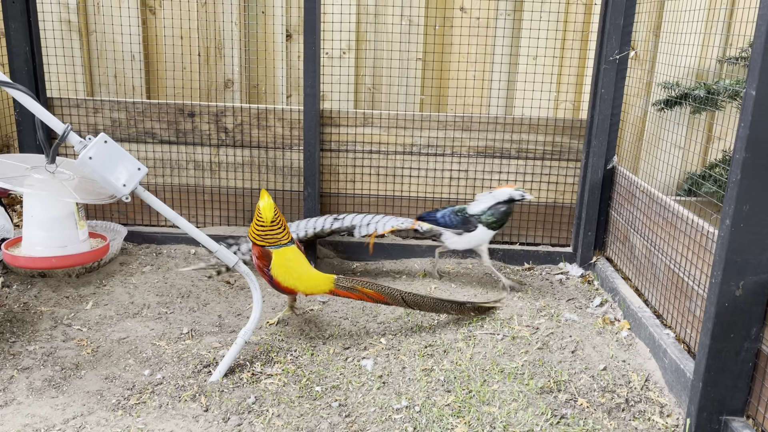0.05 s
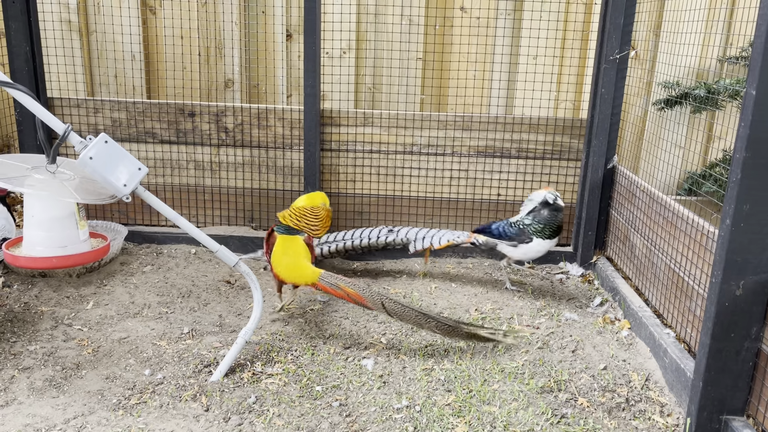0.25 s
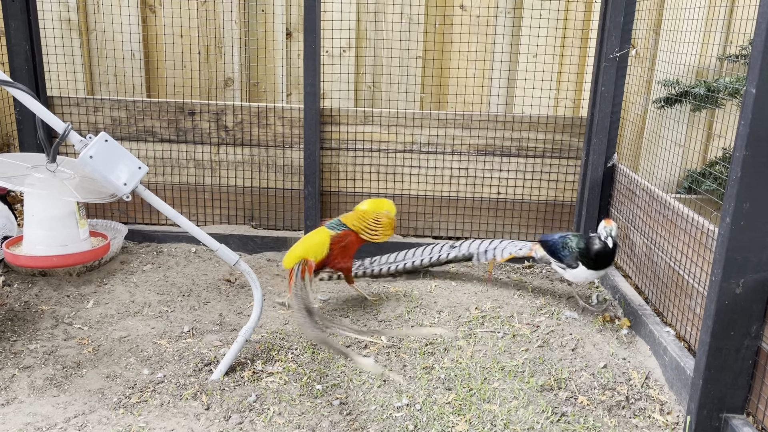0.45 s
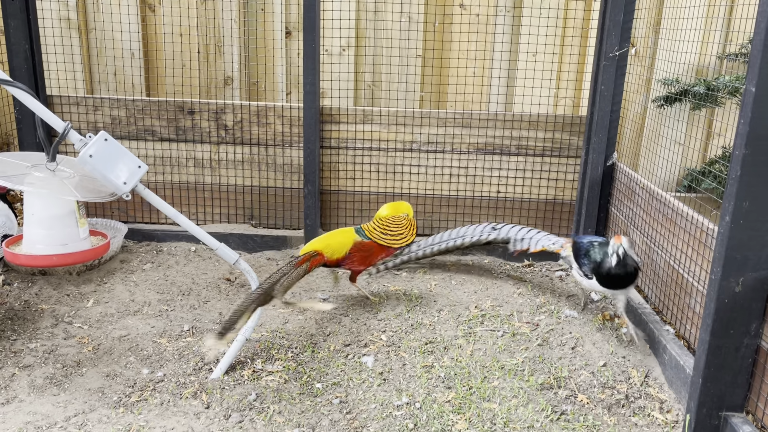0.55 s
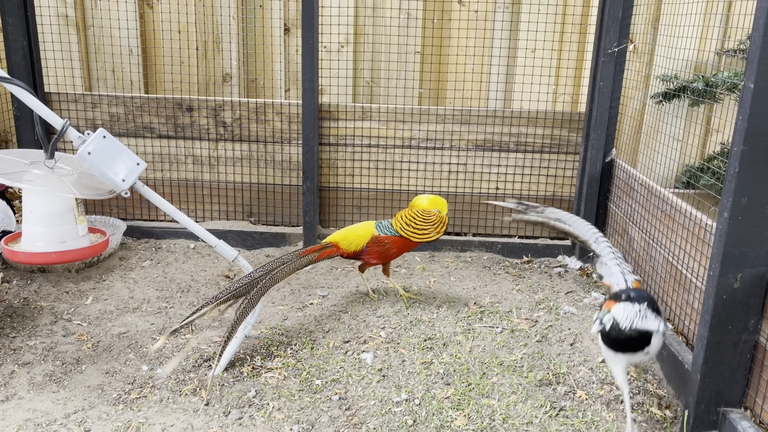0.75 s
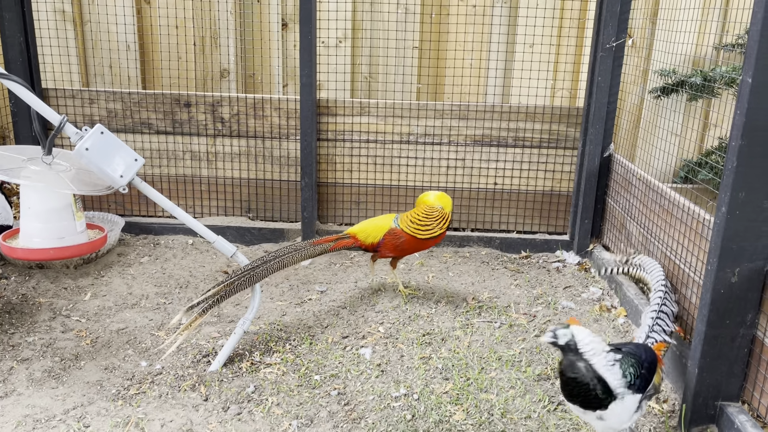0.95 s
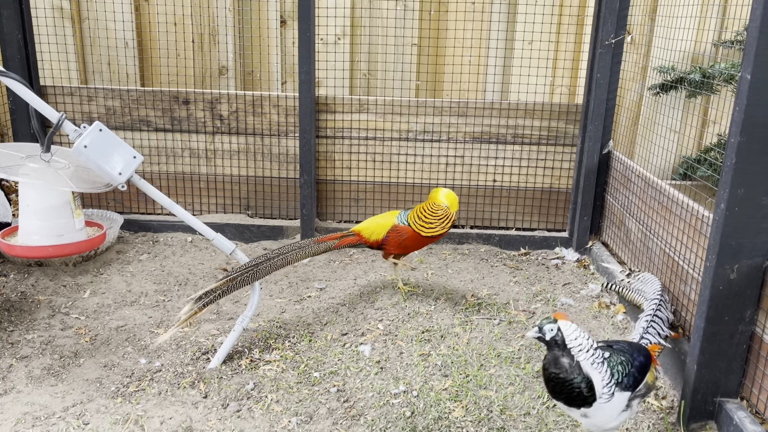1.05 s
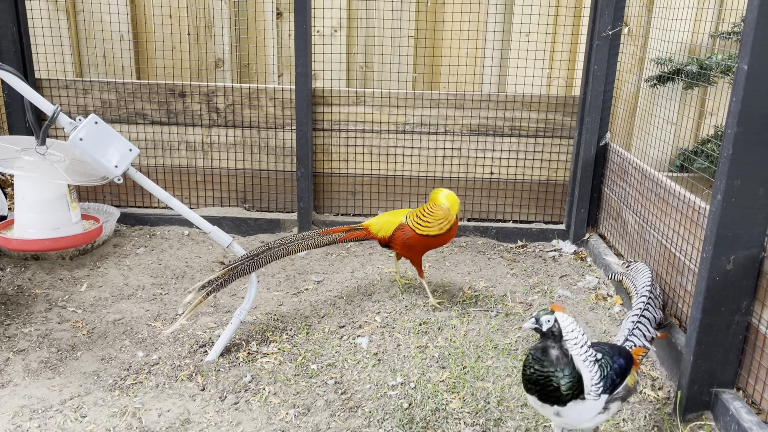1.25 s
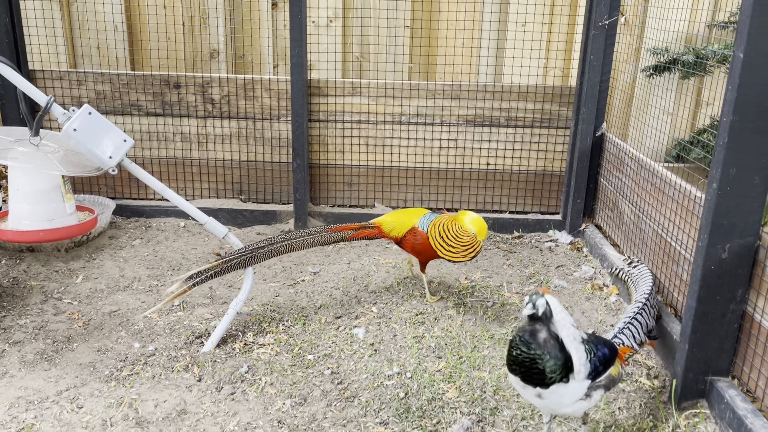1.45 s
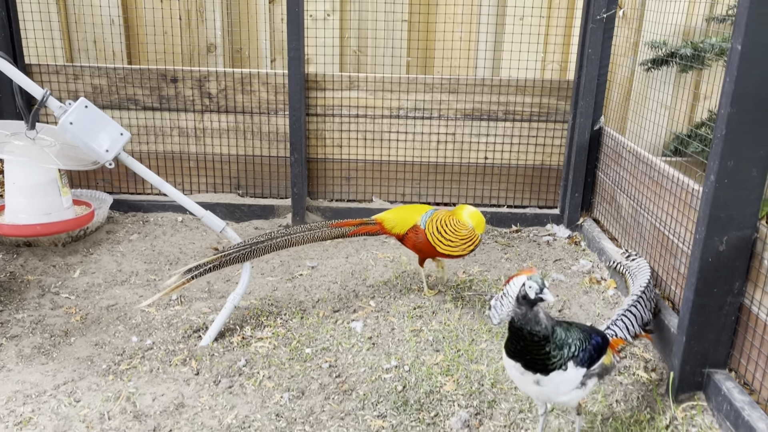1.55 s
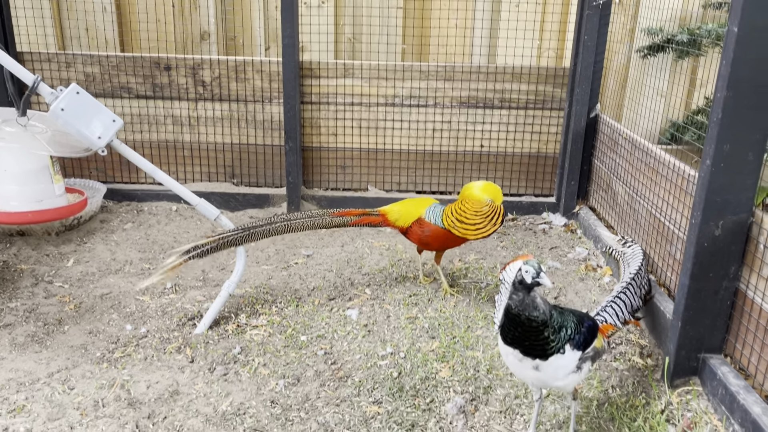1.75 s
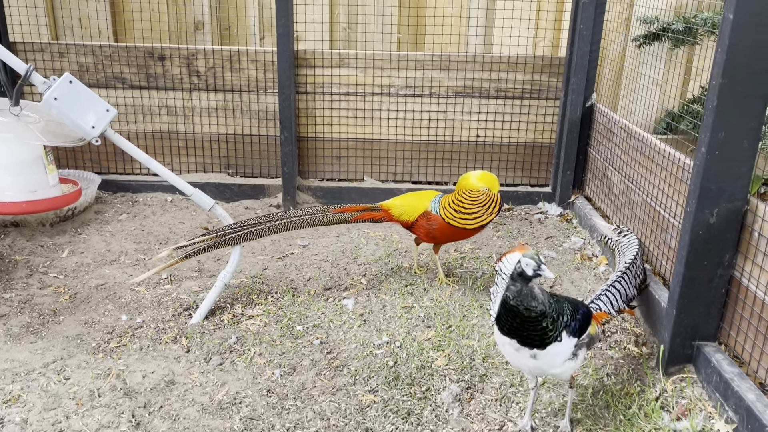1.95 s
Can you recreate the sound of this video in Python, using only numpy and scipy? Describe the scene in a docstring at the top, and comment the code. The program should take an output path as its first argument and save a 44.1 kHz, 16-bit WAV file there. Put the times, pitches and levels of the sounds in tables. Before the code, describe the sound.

Shrill pheasant squeal outdoors, followed by quiet clucks, peeps and light foot scuffs.

```python
"""Two pheasants walk about in a wire aviary backed by a wooden fence.
A distant rumble, open air and a low hum run throughout. After a faint scuff, one bird gives a shrill,
wavering squeal that breaks downward at 0.4 s. From 0.6 s feet scuff and pat the dry ground,
and soft arched peeps and clucks follow until 1.8 s. Fence and ground throw back quick echoes."""
import sys
import numpy as np
from scipy import signal
from scipy.fft import rfft, irfft
from scipy.io import wavfile

SR = 44100
rng = np.random.default_rng(int(sys.argv[2]) if len(sys.argv) > 2 else 0)


def wav_out(sig):
    """Save sig, one row per channel (or a flat mono array), as 16-bit PCM at SR to the path in sys.argv[1]."""
    wavfile.write(sys.argv[1], SR, np.round(np.clip(np.atleast_2d(sig).T, -1, 1) * 32767).astype(np.int16))


N = 88200
T = np.arange(N) / SR
FREQS = np.maximum(np.arange(N // 2 + 1) * SR / N, 1)
JITTER_HZ = 684   # bandwidth of the voice's pitch jitter


def from_db(db):
    """Decibels to gain."""
    return 10 ** (np.asarray(db) / 20)


def rms_one(x):
    """Scale to unit power."""
    return x / np.sqrt(np.mean(x ** 2) + 1e-20)


def in_time(rows):
    """Each column of a curve at every sample."""
    time_s, *columns = np.transpose(rows)
    return [np.interp(T, time_s, column) for column in columns]


def at_hz(points, hz):
    """Read a spectrum on a log-frequency axis."""
    freq_hz, values = np.transpose(points)
    return np.interp(np.log(hz), np.log(freq_hz), values)


def panned(x, pan_db):
    """Left louder than right by pan_db."""
    return np.array([x * from_db(pan_db / 2), x * from_db(-pan_db / 2)])


def drift(rate_hz):
    """Low-passed noise, unit power."""
    return rms_one(irfft(rfft(rng.standard_normal(N)) / (1 + (FREQS / rate_hz) ** 2), N))


def coloured(x, spectrum):
    """Give a noise a spectrum; unit power."""
    return rms_one(irfft(rfft(x) * from_db(at_hz(spectrum, FREQS)), N))


def partial(hz, multiple):
    """One partial of a gliding pitch, unit power, muted above Nyquist."""
    return np.sqrt(2) * np.sin(2 * np.pi * multiple * np.cumsum(hz) / SR) * (multiple * hz < SR / 2)


def bursts(rows):
    """Sum of envelopes: linear attack, exponential decay."""
    return sum(from_db(level_db) * np.clip((T - start_s) / attack_s, 0, 1)
               * np.exp(-np.maximum(T - start_s - attack_s, 0) / decay_s)
               for start_s, attack_s, decay_s, level_db in rows)


def wide_noise(spectrum):
    """Stereo noise, alike in the bass and looser above."""
    # left-right likeness: freq_hz, correlation
    likeness = [(40, 1), (120, 0.4), (250, 0.59), (500, 0.058), (800, -0.089), (1400, -0.13), (3000, 0.6),
                (9000, 0.066)]
    alike = at_hz(likeness, FREQS)
    mid, side = rfft(rng.standard_normal((2, N)))
    stereo = np.sqrt(1 + alike) * mid + np.sqrt(1 - alike) * side * [[1], [-1]]
    return coloured(irfft(stereo, N), spectrum)


def outdoors():
    """Slowly swelling distant rumble and steady open air."""
    # rumble spectrum: freq_hz, gain_db
    rumble_colour = [(12, -36.5), (25, -21.5), (38, -7), (50, 1), (62, -2), (76, 6), (100, -7), (150, -9),
                     (200, -13.5), (300, -22.5), (600, -43), (3000, -100)]
    # rumble swell: time_s, gain_db
    rumble_swell = [(0, 2), (.15, 1.5), (.35, -1), (.55, -3), (.66, 1.5), (.85, -3), (.93, 2), (1.1, -0.5),
                    (1.32, 0), (1.45, 0.5), (1.6, -0.5), (2, -0.5)]
    # air spectrum: freq_hz, gain_db
    air_colour = [(100, 0), (250, -1.5), (460, 1.5), (650, -1), (950, -2), (1300, -7.5), (1760, -8.5),
                  (2600, -19), (4500, -21), (6500, -23), (8600, -18.5), (10000, -21.5), (11200, -26.5),
                  (12200, -62), (15000, -70)]
    rumble = from_db(-41.4 + in_time(rumble_swell)[0]) * wide_noise(rumble_colour)
    return rumble + from_db(-50.4) * wide_noise(air_colour)


def hum():
    """Machine hum, wavering in pitch and level."""
    # overtones: multiple, gain_db
    overtones = [(2, -20), (3, -26.5), (3.8, -23)]
    hz = 120.64 * (1 + .012 * drift(5.7))
    tone = partial(hz, 0.99) + sum(from_db(db) * partial(hz, k) for k, db in overtones)
    return tone * from_db(-43.9 + 0.9 * drift(5.8))


def aviary(x, scatter_db):
    """Direct sound, a few echoes, quick scatter in the pen and a faint tail from the yard."""
    # echoes off ground, frame, fence and a far wall: delay_s, left_db, right_db
    echoes = [(.0037, -15, -34.5), (.0093, -7.5, -18), (0.0145, -40, -12.5), (0.0204, -25, -25),
              (.104, -32.5, -39.5)]
    # phase lead of the left channel: freq_hz, lead_rad
    left_lead = [(300, .05), (1500, .4), (2400, .8), (4400, 1.25), (8000, 1.2), (12000, 1.15)]
    pen_t60_s, pen_db = 0.054, -17.5
    yard_t60_s, yard_db, yard_delay_s = 0.44, -22, 0.03
    pen = rng.standard_normal((2, N)) * from_db(-60 * T / pen_t60_s) * (T > echoes[0][0])
    yard = rng.standard_normal((2, N)) * from_db(-60 * T / yard_t60_s) * (T > yard_delay_s)
    scatter = from_db(pen_db) * rms_one(pen) + from_db(yard_db) * rms_one(yard)
    response = from_db(scatter_db) * scatter / np.sqrt(N)
    for delay_s, left_db, right_db in echoes:
        response[:, int(delay_s * SR)] += from_db([left_db, right_db])
    wet = x + signal.fftconvolve(x, response, axes=1)[:, :N]
    return irfft(rfft(wet) * np.exp(.5j * at_hz(left_lead, FREQS) * np.array([[1], [-1]])), N)


def feet():
    """Feet and tail scuff dry grit; footfalls pat the earth."""
    # scuffs: start_s, attack_s, decay_s, level_db
    scuffs = [(.05, 0.038, 0.11, -59), (.622, .005, 0.03, -53.5), (.786, .008, 0.022, -54),
              (.858, 0.0074, 0.027, -58), (.915, 0.0049, 0.07, -56), (1.49, 0.015, .04, -83),
              (1.69, 0.015, 0.042, -63.5), (1.91, 0.022, 0.043, -68)]
    # scuff spectrum: freq_hz, gain_db
    grit_colour = [(1000, 3), (2500, -0.5), (3400, 0.5), (5500, -2), (8500, 4), (10500, 5), (11800, -3.5),
                   (13000, -38), (15000, -40)]
    # footfalls: start_s, attack_s, decay_s, level_db
    steps = [(.613, 0.00093, 0.0065, -42), (.72, .003, .008, -57), (.945, 0.014, 0.017, -53)]
    # footfall spectrum: freq_hz, gain_db
    earth_colour = [(150, -69), (400, 5.5), (750, 16.5), (1300, 9.5), (2500, -24), (6000, -38)]
    grains = rng.standard_normal(N) * from_db(drift(rate_hz=420))
    earth = coloured(rng.standard_normal(N), earth_colour)
    return bursts(scuffs) * coloured(grains, grit_colour) + bursts(steps) * earth


def peeps():
    """Contact notes: a raspy start, then the pitch arches in steps through the voice's registers."""
    # peeps and clucks; touching notes join into one call: start_s, rise_s, fall_s, start_hz, top_hz,
    # end_hz, level_db, swell_db, overtone_db, rasp_db, pan_db
    notes = [(.697, 0.024, 0.003, 1004, 2444, 2400, -39.5, -2, -21.5, -43, 2),
             (0.752, 0.014, 0.0093, 1050, 2263, 2105, -41, -7, -21, -48, 1.5),
             (0.929, .026, 0.0043, 1024, 1370, 1350, -56, -8, -23, -57, -8),
             (0.966, 0.012, 0.0148, 1003, 1645, 1250, -41.5, -3, -20, -54, 1.5),
             (1.004, 0.014, 0.0081, 1076, 1650, 1390, -40, 2, -19.5, -79, 1.5),
             (1.148, 0.0153, 0.0062, 895, 2503, 2380, -38, 4.5, -21, -38.5, 1),
             (1.162, 0.011, 0.013, 3210, 3510, 3330, -39, -7, -14, -86, 3),
             (1.199, 0.00676, 0.0061, 2573, 3486, 2380, -27.5, 9, -27, -51, 4.5),
             (1.476, .028, 0.0015, 1094, 1900, 1950, -38, 14, -23.5, -37.5, -.4),
             (1.503, 0.015, 0.022, 2100, 2530, 2370, -42, 2, -19, -63, 6),
             (1.547, 0.0022, 0.023, 1950, 1950, 1540, -40, -3, -16, -64, -2),
             (1.707, 0.017, 0.0036, 1408, 1958, 1950, -42, 12, -14, -46.5, -0.5),
             (1.724, 0.0174, 0.0076, 2216, 2436, 2520, -38.5, 18, -29, -61, 2),
             (1.744, 0.0085, 0.0081, 2650, 2810, 2680, -38, 7, -24, -71, 5.5)]
    # throat response: freq_hz, gain_db
    throat = [(800, 2), (1200, -4.5), (1700, -1.5), (2000, 3), (2400, -8.5), (2800, 0.5), (3400, -8),
              (5000, -8), (6800, -5.5), (9000, -28)]
    # rasp spectrum: freq_hz, gain_db
    rasp_colour = [(300, -31), (650, -5), (1000, 0), (1600, 4.5), (2400, -11.5), (4000, -32.5),
                   (8000, -50.5)]
    register_hz, register_pull, slip_db = 825.3, 0.35, -4
    clear_spread_hz, hoarse_spread_hz, hoarse_s = 9.1, 109.6, 0.0051
    edge_s, rasp_attack_s, rasp_decay_s = 0.0026, 0.0053, 0.0076
    rasp_noise = coloured(rng.standard_normal(N), rasp_colour)
    out = 0
    for (start_s, rise_s, fall_s, start_hz, top_hz, end_hz,
         level_db, swell_db, overtone_db, rasp_db, pan_db) in notes:
        length_s = rise_s + fall_s
        t = np.clip(T - start_s, 0, length_s)
        arch_hz = top_hz + np.where(t < rise_s, (start_hz - top_hz) * (1 - t / rise_s) ** 2,
                                    (end_hz - top_hz) * ((t - rise_s) / fall_s) ** 2)
        # the voice clings to evenly spaced registers and weakens between them
        register_rad = 2 * np.pi * arch_hz / register_hz
        pitch_hz = arch_hz - register_pull * register_hz * np.sin(register_rad) / (2 * np.pi)
        slip = (.5 - .5 * np.cos(register_rad)) ** 2
        hz = pitch_hz + (clear_spread_hz + hoarse_spread_hz * np.exp(-t / hoarse_s)) * drift(JITTER_HZ)
        gate = np.clip(np.minimum(t, length_s - t) / edge_s, 0, 1)
        envelope = gate * from_db(level_db + swell_db * (t / length_s - .5) + slip_db * slip)
        voice = sum(from_db(db + at_hz(throat, k * pitch_hz)) * partial(hz, k)
                    for k, db in enumerate((0, overtone_db, overtone_db - 8.5), 1))
        rasp = rasp_noise * bursts([(start_s, rasp_attack_s, rasp_decay_s, rasp_db)])
        out += panned(envelope * voice + rasp, pan_db)
    return out


def squeal():
    """Near-pure whistle with three fluttering overtones; cracks and turns harsh as the pitch collapses."""
    # glide: time_s, pitch_hz
    glide = [(.16, 5206), (.171, 5150), (.178, 4776), (.187, 4120), (.21, 3970), (.223, 3745), (.236, 4020),
             (.25, 4400), (.267, 4860), (.287, 4761), (.308, 4742), (.324, 4560), (.337, 4411),
             (.362, 4405), (.386, 4190), (.391, 3860), (.394, 2750), (.409, 1627)]
    # fundamental: time_s, level_db
    loudness = [(.158, -70), (.166, -47), (.18, -52), (.2, -53), (.216, -31.5), (.238, -25.5),
                (.262, -30.5), (.272, -35.5), (.284, -19.5), (.295, -48), (.304, -49), (.312, -28),
                (.331, -24.5), (.336, -20), (.368, -19), (.39, -27), (.398, -39), (.408, -42), (.413, -55)]
    # overtones: time_s, second_db, third_db
    overtones = [(.158, -68, -90), (.175, -49, -65), (.184, -38, -49), (.197, -46, -48), (.209, -32, -46),
                 (.226, -59, -38.5), (.25, -45, -55), (.268, -51.5, -58), (.281, -46.5, -53),
                 (.29, -58, -60.5), (.299, -51, -63), (.315, -48.5, -65.5), (.326, -58, -69),
                 (.338, -37, -55), (.364, -39.5, -60), (.382, -56, -48), (.393, -48, -37),
                 (.402, -43, -50.5), (.413, -78, -61)]
    # pitch unsteadiness: time_s, jitter_share
    roughness = [(.16, 0.0044), (.186, 0.02), (.21, 0.0013), (.24, 0.0027), (.26, 0.01), (.272, 0.0012),
                 (.34, 0.0008), (.38, 0.005), (.39, 0.03), (.396, 0.051), (.41, 0.076)]
    # stereo balance: freq_hz, left_minus_right_db
    balance = [(2000, 2), (3800, 2.5), (4400, 2.5), (4700, 8), (8000, 0), (13000, -1)]
    # cracks into hiss: start_s, attack_s, decay_s, level_db
    cracks = [(.254, .003, 0.004, -39.5), (.391, 0.0038, 0.012, -37)]
    # hiss spectrum: freq_hz, gain_db
    crack_colour = [(1200, -58), (2500, -14), (4200, 2), (5800, -7), (8500, 13), (10300, -5), (11600, 14),
                    (13500, -39)]
    waver_share, waver_hz, flutter_db, flutter_hz = 0.61, 89, 2, 150
    (pitch_hz,), (level_db,), (jitter_share,) = in_time(glide), in_time(loudness), in_time(roughness)
    second_db, third_db = in_time(overtones)
    hz = pitch_hz * np.exp(jitter_share * (drift(JITTER_HZ) + waver_share * drift(waver_hz)))
    overtones_db = [db + flutter_db * drift(flutter_hz) for db in (second_db, third_db, third_db - 13)]
    whistle = sum(panned(from_db(db) * partial(hz, k), at_hz(balance, k * pitch_hz))
                  for k, db in enumerate([level_db] + overtones_db, 1))
    sounding = (T > loudness[0][0]) & (T < loudness[-1][0])
    return sounding * whistle + bursts(cracks) * coloured(rng.standard_normal(N), crack_colour)


def scene():
    """The birds in their pen over the outdoor background."""
    birds = aviary(squeal(), scatter_db=0) + aviary(peeps() + feet(), scatter_db=1.5)
    return birds + (hum() + outdoors()) * panned(1, pan_db=1.77)[:, None]


def record(dry):
    """Treble colour, 2 ms end fades and a steep low-pass."""
    # treble colour, a narrow dip near 10 kHz and a dull top: freq_hz, gain_db
    treble_colour = [(9700, 0), (10250, -13), (10800, 2.5), (12600, -4), (13800, -7), (15500, -6.5)]
    cutoff_hz = 15700
    heard = irfft(rfft(dry) * from_db(at_hz(treble_colour, FREQS)), N)
    fade = np.clip(np.minimum(T, T[-1] - T) / .002, 0, 1)
    return signal.sosfilt(signal.butter(24, cutoff_hz, fs=SR, output="sos"), heard * fade)


dry = scene()
out = record(dry)
wav_out(out)
```